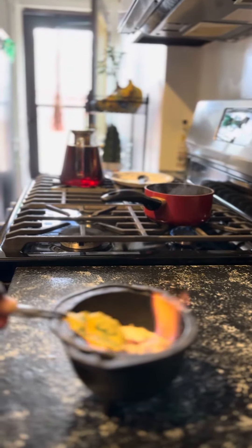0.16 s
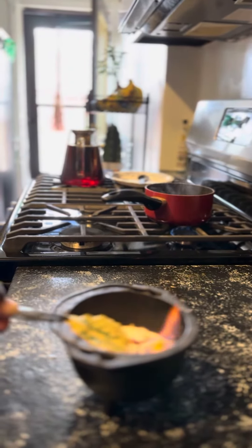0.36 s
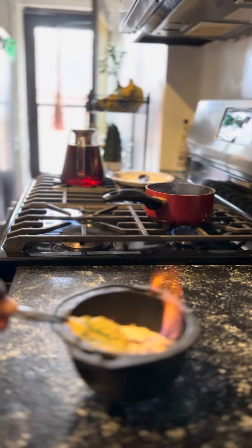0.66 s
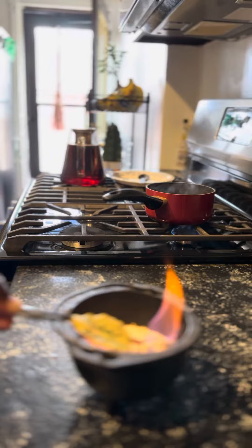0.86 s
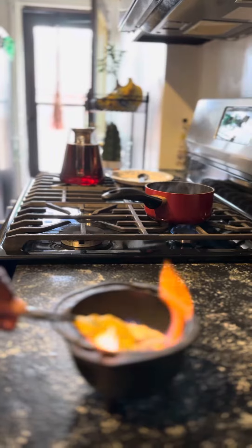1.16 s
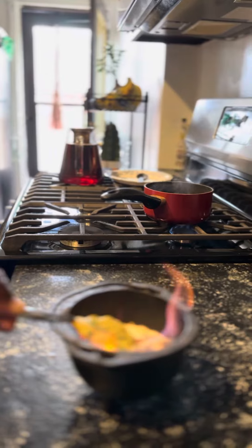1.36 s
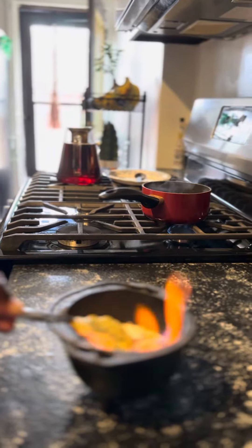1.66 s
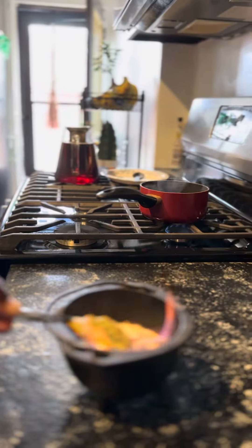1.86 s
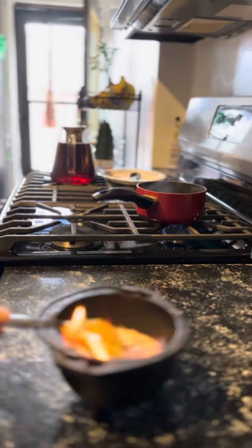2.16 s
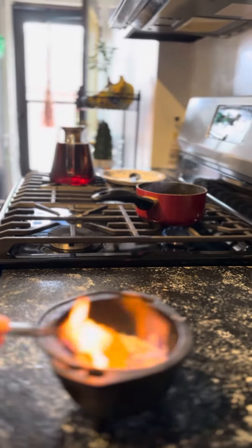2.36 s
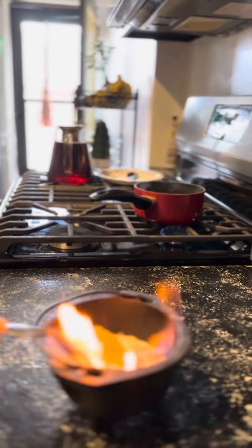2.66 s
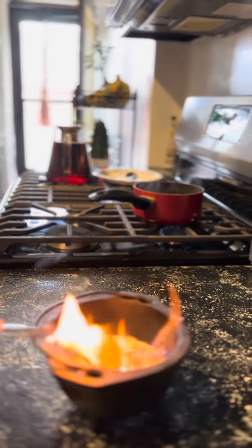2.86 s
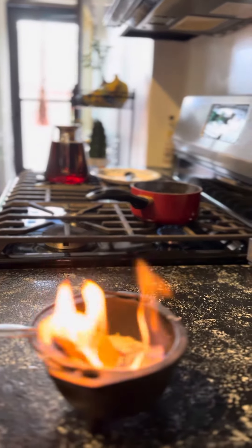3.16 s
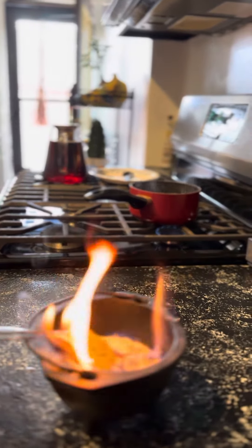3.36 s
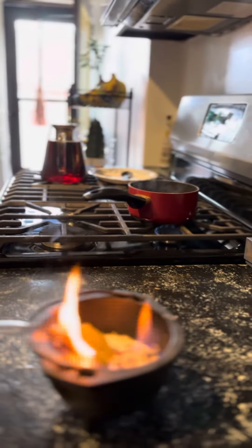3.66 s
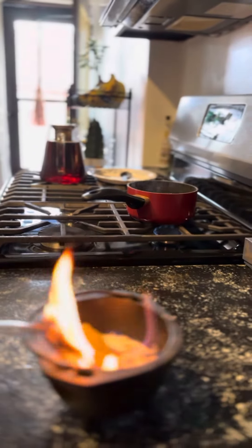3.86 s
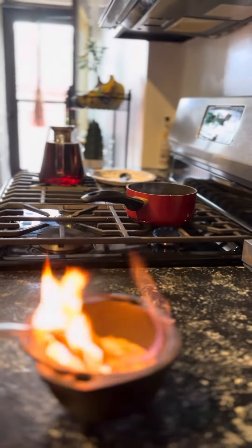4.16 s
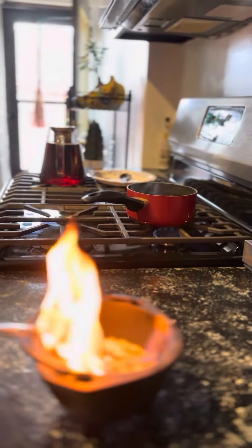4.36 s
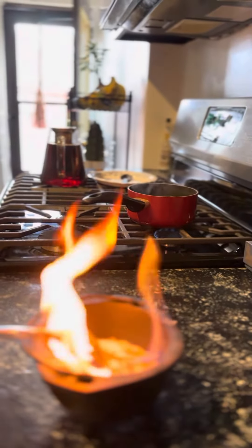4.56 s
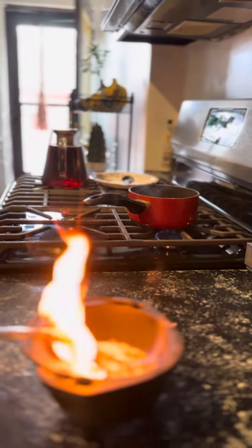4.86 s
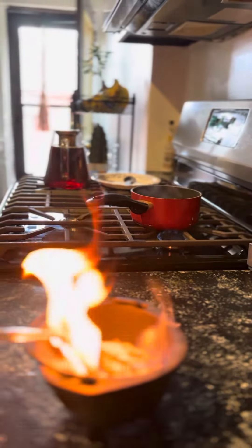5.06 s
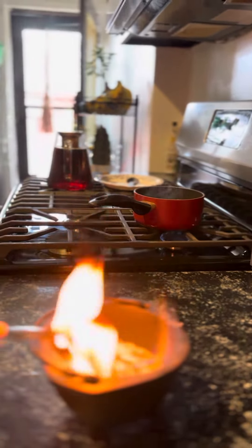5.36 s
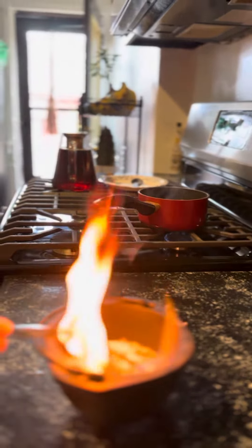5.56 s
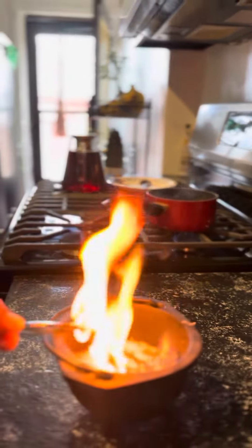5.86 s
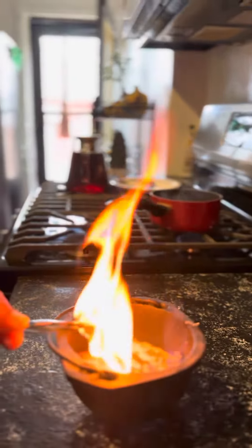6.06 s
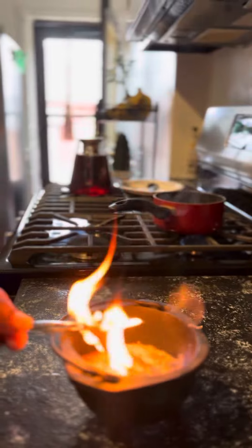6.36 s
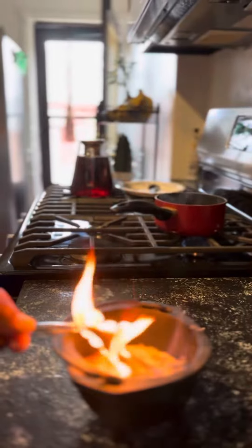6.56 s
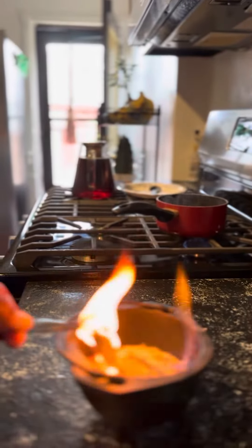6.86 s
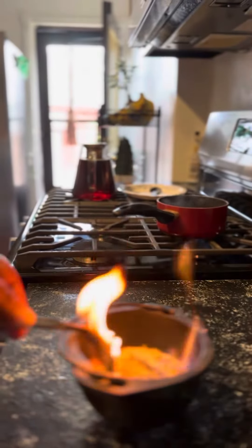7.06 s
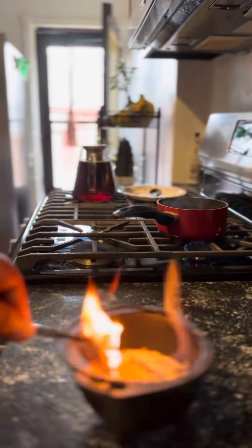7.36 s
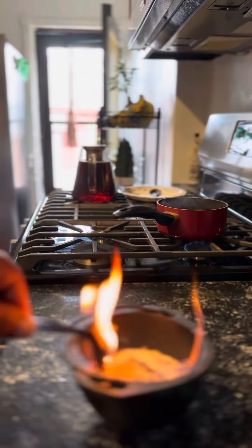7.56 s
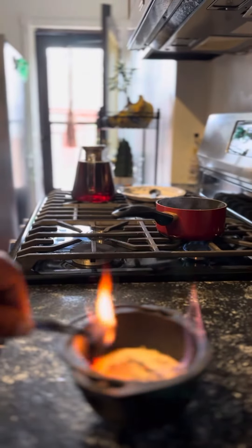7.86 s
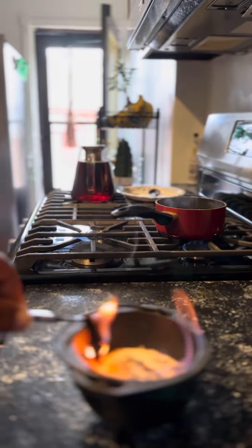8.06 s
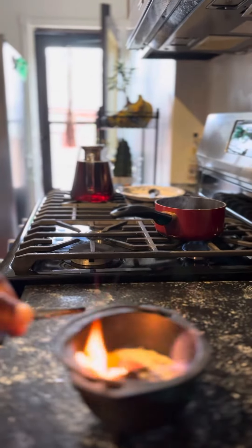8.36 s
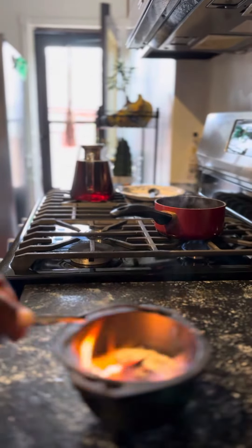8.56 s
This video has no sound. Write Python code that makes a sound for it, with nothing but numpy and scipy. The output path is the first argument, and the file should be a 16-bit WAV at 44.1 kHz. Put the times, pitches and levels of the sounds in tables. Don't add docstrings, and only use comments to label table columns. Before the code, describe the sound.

For the first half second there is only a quiet kitchen: faint low refrigerator hum, soft rumble and thin airy hiss. Around 0.5 s scraps catch, and a fine crisp sizzle starts with small ticks; low, soft puffs of flame follow from 0.85 s. At 1.7 s comes the loudest, sharpest snap. Between 2 and 2.8 s stirring brings dense crackling and stronger fluttering puffs. A brief crisp surge comes at 3.6 s, then the flame flutters fullest around 4 to 4.5 s with frequent snaps. From 5.2 s, faint low air bumps touch the microphone; crackles become sparser and less hollow while puffs cluster around 5.6 to 6.8 s. It calms near 7.2 s, flares at 8 to 8.2 s with rapid snaps and puffs, then fades into tiny ember ticks, with a soft bump at 8.6 s. Close stereo, small lightly reflective kitchen.

```python
import sys
import numpy as np
from scipy import signal
from scipy.fft import rfft, irfft, next_fast_len
from scipy.io import wavfile
from scipy.ndimage import uniform_filter1d, map_coordinates

SR = 44100
rng = np.random.default_rng(int(sys.argv[2]) if len(sys.argv) > 2 else 0)


def store_pcm(level_fs):
    pcm = np.round(np.clip(level_fs, -1, 1) * 32767).astype(np.int16)
    wavfile.write(sys.argv[1], SR, np.atleast_2d(pcm).T)


def boost_factor(decibels):
    exponent = np.asarray(decibels, float) / 20
    return 10 ** exponent


N = 384552


def unit(x):
    return x / np.sqrt(np.mean(x ** 2) + 1e-30)


def along(points, hz):
    f, v = np.transpose(points)
    return np.interp(np.log(hz + 1), np.log(f + 1), v)


def curve(rows):
    s, v = np.transpose(rows)
    return np.interp(np.arange(N) / SR, s, v)


def wobble(rate):
    knots = rng.standard_normal(int(N * rate / SR) + 4)
    return map_coordinates(knots, [np.arange(N) * rate / SR])


def filtered(x, response):
    m = 2 * next_fast_len(N // 2 + SR // 8)
    return irfft(rfft(x, m) * response(np.fft.rfftfreq(m, 1 / SR)), m)[..., :N]


def causal(spectrum):
    def response(hz):
        cep = irfft(np.log(boost_factor(np.maximum(along(spectrum, hz), -70))))
        half = len(cep) // 2
        cep[1:half] *= 2
        cep[half + 1:] = 0
        return np.exp(rfft(cep))
    return response


def scatter(times, shapes):
    start = np.round(np.asarray(times) * SR).astype(int)[:, None]
    at = start + np.arange(shapes.shape[1])
    return np.bincount(at.ravel(), shapes.ravel(), N + SR)[:N]


def bursts(count, life, after_db, vary):
    t = np.arange(round(SR / 80)) / SR
    draw = rng.standard_normal((count, len(t) + 1))
    u = t / (life * np.exp(vary * draw[:, :1]))
    split = 2 * np.sqrt(u) * np.exp(-u)
    rattle = boost_factor(after_db) * np.minimum(u, 1) * np.exp(-t / 0.0044)
    burst = draw[:, 1:] * (split + rattle)
    return burst / np.linalg.norm(burst, axis=1, keepdims=True)


def swarm(count, spread_db, top_db, life):
    draw = rng.random((count, 2))
    size = boost_factor(np.minimum(-spread_db * np.log(1 - draw[:, 1:]), top_db))
    return unit(scatter(draw[:, 0] * N / SR, size * bursts(count, life, after_db=-18.5, vary=0.53)))


def diffuse(spectrum, side_db, patchy_db):
    z = signal.stft(rng.standard_normal((2, N)), nperseg=512)[2]
    field = uniform_filter1d(rng.standard_normal(z.shape[1:]), size=6, axis=0)
    field = uniform_filter1d(field, size=10, axis=1)
    pair = signal.istft(z * boost_factor(patchy_db * unit(field)), nperseg=512)[1][:, :N]

    def colour(hz):
        return boost_factor(along(spectrum, hz)) * np.array([np.ones_like(hz), boost_factor(along(side_db, hz))])
    mid, side = filtered(pair, colour)
    return np.array([mid + side, mid - side]) / np.std(mid)


MOTOR_HZ = 58.88
# [multiple of the shaft rate, peak level/dB]
MOTOR = [(1, -64), (2, -66), (10, -74), (14, -75), (25, -90), (26, -90), (27, -87), (29, -89), (31, -90),
         (32, -83), (33, -90), (35, -90), (40, -93), (41, -91), (51, -94)]


def fridge():
    turn = 2 * np.pi * MOTOR_HZ * np.arange(N) / SR
    hum = 0
    for k, db in MOTOR:
        hum = hum + boost_factor(db + 2.6 * wobble(7.9)) * np.sin(k * turn + 7 * rng.random())
    return hum


# [f/Hz, side minus mid level/dB]
KITCHEN_SIDE = [(60, -20), (110, -25), (200, -10.5), (380, -12.5), (800, 5), (1900, -2.5), (3200, 1.5),
                (4900, 6), (6800, -10.5), (9000, 7), (12800, 11), (15200, 4)]
# [f/Hz, level/dB]
KITCHEN_HISS = [(700, -49), (1000, -8), (1900, -2), (2600, -3), (3230, -12.5), (4350, -7), (5000, -12),
                (7500, -14), (10500, -31), (12800, -35), (15200, -20), (16500, -34)]


def hiss():
    return boost_factor(-75.5) * diffuse(KITCHEN_HISS, KITCHEN_SIDE, patchy_db=1.8)


# [f/Hz, level/dB per Hz]
RUMBLE = [(20, -23), (45, -7.5), (58, -0.5), (70, 5), (82, -6.5), (120, -1), (150, 1.5), (170, -2),
          (185, -9), (269, -10.5), (341, -5), (560, -16), (1000, -33), (1430, -57)]
RUMBLE_DB, RUMBLE_GROWS, RUMBLE_SMOOTH_S = -51, 0.3, 0.071


def rumble():
    slow_db = uniform_filter1d(flutter_db(), size=round(RUMBLE_SMOOTH_S * SR))
    level_db = RUMBLE_DB + RUMBLE_GROWS * (slow_db - slow_db.mean())
    return boost_factor(level_db + 1.06 * wobble(5.4)) * diffuse(RUMBLE, KITCHEN_SIDE, patchy_db=1.7)


# [f/Hz, time to fall 60 dB t/s]
WALLS = [(200, 0.25), (2500, 0.22), (10000, 0.14)]


def walls(x):
    hz, t, z = signal.stft(rng.standard_normal((2, SR // 3)), SR, nperseg=256)
    z[1] *= boost_factor(along(KITCHEN_SIDE, hz))[:, None]
    decay = boost_factor(-60 * t / along(WALLS, hz)[:, None])
    mid, side = signal.istft(z * decay, SR, nperseg=256)[1]
    tail = np.array([mid + side, mid - side]) / np.linalg.norm(mid)
    late = np.pad(x, (90, 0))
    return signal.fftconvolve(late[None], tail, axes=1)[:, :N]


# [t/s, peak level/dB, pitch f/Hz]
BUMPS = [
    (5.18, -52, 130),
    (5.33, -61, 90),
    (5.539, -46, 171),
    (8.602, -48, 155),
]


def bumps():
    s, db, hz = np.transpose(BUMPS)[:, :, None]
    t = np.arange(SR // 12) / SR
    swell = (t / 0.013) * np.exp(1 - t / 0.0095)
    bump = boost_factor(db) * np.sin(2 * np.pi * hz * t) * swell
    return scatter(s[:, 0] - .02, bump) * np.array([[1.], [-.7]])


# [t/s, length t/s, sizzle level/dB, flutter level/dB]
STIRS = [(0.625, 0.04, -55.5, -60), (0.725, 0.034, -57, -53), (1.056, 0.15, -66.5, -54),
         (1.303, 0.15, -60.5, -58.5), (1.603, 0.077, -57.5, -72), (1.778, 0.075, -62, -75),
         (2.006, 0.079, -54, -54.5), (2.202, 0.13, -52.5, -48.5), (2.315, 0.033, -53, -44.5),
         (2.495, 0.24, -57.5, -57), (2.773, 0.039, -54, -48), (2.95, 0.074, -63, -78),
         (3.169, 0.062, -57, -52.5), (3.615, 0.095, -47.5, -52.5), (3.78, 0.036, -52.5, -65),
         (3.96, 0.1, -57.5, -49.5), (4.162, 0.11, -54.5, -49), (4.236, 0.093, -54, -44.5),
         (4.415, 0.19, -58, -50.5), (4.65, 0.15, -59.5, -74), (4.873, 0.11, -52, -50.5),
         (5.19, 0.12, -59, -50), (5.575, 0.027, -58, -47.5), (5.938, 0.1, -66, -52),
         (6.426, 0.052, -58, -48), (6.84, 0.12, -59, -51.5), (7.34, 0.038, -65, -50.5),
         (7.59, 0.049, -79, -53), (7.97, 0.13, -59, -50.5), (8.12, 0.092, -50.5, -49)]


def stirred(base_db, peaks_db):
    power = boost_factor(2 * base_db[::64])
    t = np.arange(len(power)) * 64 / SR
    for (s, length, *_), db in zip(STIRS, peaks_db):
        power = power + boost_factor(2 * db) * np.exp(-2 * ((t - s) / length) ** 2)
    return np.interp(np.arange(N) / SR, t, 10 * np.log10(power))


# [t/s, flutter level/dB]
BLAZE = [(0, -63), (.4, -62), (.7, -57), (1.8, -58), (2.3, -57), (3, -57.5), (4.2, -51), (5.4, -56.5),
         (6.3, -53), (7.2, -60), (8.1, -53), (8.72, -55.5)]


def flutter_db():
    return stirred(curve(BLAZE), [row[3] for row in STIRS])


# [t/s, peak level/dB, pitch f/Hz]
PUFFS = [(.851, -36.5, 370), (1.1, -30.5, 380), (2.131, -30, 350), (2.282, -26, 400), (2.727, -31, 400),
         (3.125, -37.5, 363), (3.948, -34, 330), (4.107, -31, 390), (4.127, -27, 410), (4.402, -28.5, 353),
         (4.447, -34, 345), (5.202, -32.5, 395), (5.627, -31, 387), (5.751, -32.5, 332), (5.81, -33.5, 372),
         (6.001, -32, 367), (6.078, -31, 375), (6.259, -31, 365), (6.396, -31.5, 370), (6.421, -28, 356),
         (6.643, -30, 460), (6.756, -29, 390), (6.79, -33, 330), (7.501, -35, 346), (7.662, -33, 316),
         (8.001, -30, 356), (8.055, -27.5, 390), (8.101, -26, 382), (8.126, -28, 390), (8.346, -31.5, 390)]
# [f/Hz, level/dB per Hz]
FLAME = [(110, -43.5), (180, -2), (274, -10.5), (375, 1), (438, -13), (508, -12), (717, -8), (805, -14),
         (922, -12.5), (1190, -18.5), (1300, -13), (1430, -22), (2200, -29), (2860, -51), (4840, -120)]


def flame():
    s, db, hz = np.transpose(PUFFS)[:, :, None]
    t = np.arange(SR // 40) / SR
    cycles = hz * (0.976 * t + 3 * 0.001197 * (1 - np.exp(-t / 0.00069)))
    push = np.sin(2 * np.pi * cycles) * np.exp(-t * hz / 1.36) * (1 - np.exp(-t / 0.0013))
    puffs = scatter(s[:, 0] + 0.001493, boost_factor(db - 2.5) * push)
    lumps = swarm(count=1000, spread_db=3.5, top_db=11.0, life=0.00058) + 0.59 * rng.standard_normal(N)
    unsteady = boost_factor(0.89 * wobble(25) + 0.47 * wobble(17))
    flutter = unit(filtered(lumps * unsteady, causal(FLAME)))
    return puffs + boost_factor(flutter_db() - 3.0) * flutter


HOLLOW_HZ, HOLLOW_WIDTH_HZ = 2730, 760


def hollow_ring(f):
    return 1j * f * HOLLOW_WIDTH_HZ / (HOLLOW_HZ ** 2 - f * f + 1j * f * HOLLOW_WIDTH_HZ)


EMBERS_DB, EMBERS_GROW = -62, 0.7
CATCH_S, CATCH_RISE_S = 0.48, 0.076
SPENT_S, SPENT_DB = 8.3, -6


def sizzle_db():
    t, blaze_db = np.arange(N) / SR, curve(BLAZE)
    lit_db = -20 * np.clip((CATCH_S - t) / CATCH_RISE_S, 0, 1) + SPENT_DB * (t > SPENT_S)
    embers_db = EMBERS_DB + EMBERS_GROW * (blaze_db - blaze_db.mean())
    return stirred(embers_db + lit_db, [row[2] for row in STIRS])


# [f/Hz, level/dB per Hz]
CRISP = [(530, -37.5), (900, -2.5), (1180, -8.5), (1300, -5), (1490, -11), (2260, -14.5), (2690, 14.5),
         (3230, -18), (4790, -23), (5760, -9.5), (7360, -15), (8850, -8.5), (12500, -21), (15400, -16.5),
         (17000, -34.5)]
GRAIN_TOP_DB = 11
BURNT_FROM_S, BURNT_BY_S, BURNT_DAMPS = 5.2, 7.6, 0.39


def sizzle():
    def direct(f):
        return causal(CRISP)(f) * (1 - 0.78 * hollow_ring(f))
    grains = swarm(count=4000, spread_db=4.5, top_db=GRAIN_TOP_DB, life=0.00035)
    grains = grains + 0.5 * rng.standard_normal(N)
    deep = swarm(count=1800, spread_db=8.5, top_db=GRAIN_TOP_DB, life=0.00051)
    clumps = boost_factor(2.8 * wobble(35) + 1.67 * wobble(9.1))
    fizz = unit(filtered(grains * clumps, direct) + 0.65 * filtered(deep * clumps, hollow_ring))
    burnt = np.clip((np.arange(N) / SR - BURNT_FROM_S) / (BURNT_BY_S - BURNT_FROM_S), 0, 1)
    fizz = fizz - BURNT_DAMPS * burnt * filtered(fizz, hollow_ring)
    return boost_factor(sizzle_db() - 0.77) * fizz


def levelled(crack, response, band):
    hz = np.fft.rfftfreq(1024, 1 / SR)
    z = rfft(crack, 1024, axis=1) * response(hz)
    inside = (hz > band[0]) & (hz < band[1])
    energy = np.sum(np.abs(z[:, inside]) ** 2, axis=1, keepdims=True) / 512
    return irfft(z * np.sqrt(.002 * SR / energy), axis=1)


SNAP_COLOUR = 0.81


def snap_response(f):
    flat = [(at, SNAP_COLOUR * min(level, -6)) for at, level in CRISP]
    no_bass = (1j * f / (3400 + 1j * f)) ** 2
    soft_top = 1 / (1 + 1j * f / 13000) ** 2
    return causal(flat)(f) * (1 - 0.18 * hollow_ring(f)) * soft_top * no_bass


# [t/s, treble level/dB, hollow over treble level/dB, length/ms]
SNAPS = [(1.458, -42, 4.5, 0.58), (1.5838, -46.5, 2, 0.55), (1.6035, -44, -10, 0.47),
         (1.6157, -35.5, -7, 0.33), (1.6828, -24.5, -6, 0.47), (1.9412, -46, -5, 0.35),
         (2.0401, -41, -29, 0.25), (2.1284, -60, 16, 0.63), (2.1556, -55.5, 11.0, 0.45),
         (2.182, -39.5, 1.0, 0.42), (2.2255, -41, -6, 0.4), (2.2706, -33, -12.0, 0.39),
         (2.353, -32.5, 1, 0.47), (2.431, -42.5, -3, 0.39), (2.5968, -42.5, -22, 0.42),
         (2.714, -50.0, 4, 0.3), (3.1179, -46.5, 6, 0.49), (3.5795, -45.5, 2, 0.49), (3.5905, -40, 2, 1),
         (3.6034, -35.5, -16, 1.05), (3.6295, -47, 4, 0.63), (3.6881, -37, -22, 0.5),
         (3.968, -41, -10, 0.48), (3.991, -41.5, -0.5, 1), (4.173, -45, -9, 0.68),
         (4.239, -38.5, -13, 0.47), (4.3691, -37.5, -15, 0.41), (4.6628, -45.5, -4.5, 0.39),
         (4.843, -38.5, -10, 0.6), (4.956, -41.5, -3.5, 0.75), (5.5345, -44, -7.5, 0.47),
         (5.5395, -40, -10, 0.41), (5.9755, -44.5, -40, 0.41), (5.9838, -40, -28, 0.35),
         (6.3644, -37, -15, 0.33), (6.9961, -48.5, -0.5, 0.83), (7.457, -43.5, -16, 0.38),
         (7.661, -49.0, 4.5, 0.25), (7.692, -43.5, -0.5, 0.5), (7.9052, -40.5, -10, 0.85),
         (7.9352, -45.5, -9.0, 0.4), (7.9505, -41.5, -10, 0.68), (8.0197, -32.5, -30, 0.45),
         (8.0608, -35, -41, 0.81), (8.0804, -43, -8, 0.86), (8.1195, -39, -29, 0.49),
         (8.1286, -38, -1.5, 0.34), (8.147, -44.0, -12, 0.6), (8.188, -42, -2, 0.99),
         (8.2532, -42, -4, 0.36)]
# [t/s, treble level/dB, hollow over
# treble level/dB]
TICKS = [(0.5812, -56, 7), (0.7044, -62, 8), (1.188, -53.5, 1), (1.243, -48, -10.0), (1.3133, -47, -3),
         (1.3624, -54, 3.0), (1.5193, -68, 10), (1.5355, -39.5, -6), (1.559, -49, 7), (1.9557, -52.0, 1.0),
         (1.972, -49.5, -2.0), (2.0194, -47, -3.0), (2.0756, -53, 0.0), (2.1541, -68, -2),
         (2.196, -43, -8.0), (2.2489, -53.5, 6.0), (2.2616, -47.5, 4), (2.4427, -48, -4), (2.489, -50, -8),
         (2.526, -60, 12.0), (2.568, -53, -2), (2.5875, -49.5, 4), (2.623, -46.5, -3.0),
         (2.6487, -52.0, -3.5), (2.9122, -45.5, -21), (3.087, -50, -6), (3.3686, -45.5, -2),
         (3.525, -50, 2.0), (3.652, -49, -5.0), (3.6661, -46.5, -2), (4.043, -41, -18.0),
         (4.2461, -48.0, -1.0), (4.287, -43, -8), (4.3987, -45, 3.5), (4.4067, -45, 0), (4.5112, -47, -17),
         (4.787, -44.5, -10), (4.7966, -53, -3.0), (4.828, -45, -5), (5.2044, -54, 6), (5.3516, -55.5, 5),
         (5.4697, -53, 2.5), (5.7552, -52.5, -17), (5.844, -52.5, -5), (5.919, -46.5, -16),
         (6.0802, -50.5, -4), (6.3258, -49.5, -7), (6.4815, -49.5, -5), (6.7573, -47.5, -1),
         (6.802, -45.5, -19), (7.2704, -46, -13), (7.338, -47, -9), (7.587, -49, 1), (7.7973, -54, -2.0),
         (7.875, -47, -16), (8.0836, -47, -7), (8.1627, -48, -4), (8.271, -46, -2), (8.3473, -61.5, 14),
         (8.5124, -58.5, 7),
         (0.5197, -53.5, -3), (0.6096, -60, -2), (0.7395, -57, 5), (1.0412, -53, 3), (1.226, -53, 0),
        (1.254, -55.5, 1.5), (1.302, -57, 7), (1.323, -48, -10), (1.338, -58, 5), (1.398, -54, -1.0),
        (1.781, -53, -1), (1.872, -56.5, 5), (1.9106, -61, 6.0), (1.9802, -60, 5.0), (2.0146, -52.5, 2),
        (2.1234, -50.5, -3.0), (2.2654, -51.0, -2.0), (2.2833, -53, 1.0), (2.323, -58, 5), (2.422, -53, -7),
        (2.5769, -58, -9), (2.7607, -59.5, 8), (2.8021, -50, -2.5), (2.923, -60.5, 6), (2.989, -50, -7),
        (3.2855, -49, -5), (3.3288, -54, 2), (3.5307, -54, -5), (3.6187, -51.5, 6), (3.6714, -48, 1.0),
        (3.7807, -46, -13.0), (3.8098, -65, 6), (3.895, -53, -2), (4.034, -46.5, -3.5), (4.1304, -50, -7),
        (4.2179, -53, -1.0), (4.312, -50.5, -4), (4.3267, -45, -10.0), (4.4427, -47.5, -9), (4.514, -54, 6),
        (4.821, -49, -7), (5.2206, -53, -1.0), (5.9258, -52.5, -4), (6.052, -55.5, -8.5), (6.1341, -54, -7),
        (6.341, -51, -9), (6.395, -53.5, -3), (6.9163, -45, -11), (6.9919, -55, 0), (7.1058, -57.5, 1),
        (7.3234, -50, -7.0), (7.3597, -57, 1), (7.5493, -52, -15), (7.6107, -57.0, 6), (7.6479, -63, -1.0),
        (7.7362, -52, -5.0), (7.9249, -52.0, 3), (7.9827, -45, -13), (8.138, -49.0, -1), (8.5352, -56.5, 2),
         (0.4728, -59, 2), (0.7226, -63, -1), (0.938, -52, -18), (1.0496, -62, 7), (1.2687, -54, -2),
         (1.284, -53.5, -3.5), (2.0007, -54.0, -1.0), (2.0082, -60, 6.0), (2.0279, -50, -1),
         (2.0705, -52, -6), (2.0806, -60.5, 9.0), (2.15, -72, 27.5), (2.1865, -53.5, 5.0),
         (2.215, -55.5, 10.5), (2.22, -47, -9), (2.342, -48, -13.0), (2.3906, -50.5, -1), (2.668, -59, 1.0),
         (2.6971, -61, 1.0), (2.7744, -54, -16.0), (2.9528, -62, -6), (3.0119, -60.0, 2),
         (3.2333, -54, -9.0), (3.294, -52, -9), (3.316, -53, -1), (3.5467, -52.5, -3), (3.5607, -55.0, 1.0),
         (3.717, -55.5, 3), (3.736, -55, 0), (3.7776, -51, 0), (3.8744, -54.5, -4), (3.9184, -58.5, 4.0),
         (3.947, -56, -6.0), (3.959, -59, -4), (4.11, -61.0, 10.0), (4.2104, -55, -1.0),
         (4.2608, -68.0, 19.0), (4.3198, -56.5, 5), (4.416, -71, 17), (4.435, -54, 1.0),
         (4.4477, -52.0, -6), (4.6459, -64, 1.0), (4.8807, -63, 4), (4.9004, -58, 6.0), (5.0826, -55, 0),
         (5.3245, -69, 4), (5.4507, -52, -1), (5.512, -57.0, 4), (6.0044, -56.5, -2), (6.1745, -62, -1),
         (6.4212, -55, -1.0), (6.4291, -54, 0.0), (6.723, -56.5, 4), (6.8315, -50, -4), (6.8925, -56, 4),
         (7.292, -51, -4), (7.503, -73.5, 17.0), (7.9943, -47, -8), (8.2035, -55.0, 2.0), (8.6688, -60, 4)]
# [t/s, treble level/dB, hollow over treble level/dB]
DYING = [
    (8.385, -61, 9),
    (8.397, -73, -6),
    (8.42, -61, 7),
    (8.451, -67, 11),
    (8.488, -62, -2),
    (8.559, -69, -6),
    (8.703, -63.5, -3),
]
RISE_OF_LENGTH, TICK_MS = .85, .6
TREBLE_BAND_HZ, DEEP_BAND_HZ = (4000, 11000), (2200, 3300)


def snaps():
    big = [(*row[:3], RISE_OF_LENGTH * row[3]) for row in SNAPS]
    small = [(*row, TICK_MS) for row in TICKS + DYING]
    s, db, hollow_db, rise_ms = np.transpose(big + small)
    rise = np.maximum(rise_ms, .05) / 1000
    s = s - rise / 2
    crack = bursts(len(s), life=rise[:, None], after_db=-15.5, vary=0.17)
    tint_db = 3.6 * rng.standard_normal((len(s), 1))

    def tinted(f):
        octaves = np.log2(np.clip(f, 3000, 12000) / 6000)
        return snap_response(f) * boost_factor(tint_db * octaves)

    def in_bowl(f):
        return hollow_ring(f) * 1j * f / HOLLOW_HZ
    bright = boost_factor(db - 4.1)[:, None] * levelled(crack, tinted, TREBLE_BAND_HZ)
    hollow = boost_factor(db + hollow_db - 8.2)[:, None] * levelled(crack, in_bowl, DEEP_BAND_HZ)
    return scatter(s, bright) + scatter(s, hollow)


# [f/Hz, side minus mid level/dB]
NEAR_SIDE = [(100, -24), (330, -21), (800, -6), (1800, -17.5), (2500, -18), (3200, 0.5), (3700, -16),
             (4900, 5), (6300, -11.5), (9000, -2.5), (11000, 7), (12800, 4), (14000, 5.5), (15500, 5.5)]
# [f/Hz, turn/rad]
SIDE_TURN = [(300, 0), (700, 1.05), (1300, -1.5), (2700, 1.16), (3400, -2), (4500, -5), (6000, -4),
             (6400, -8), (11000, -8), (12200, -4.5), (13000, -2.5), (16000, -7.5)]


def ports(x):
    def difference(hz):
        return boost_factor(along(NEAR_SIDE, hz)) * np.exp(1j * along(SIDE_TURN, hz))
    side = filtered(x, difference)
    return np.array([x + side, x - side])


def scene():
    bowl = flame() + sizzle() + snaps()
    kitchen = fridge() + hiss() + rumble() + boost_factor(-11.0) * walls(bowl)
    return kitchen + bumps() + ports(bowl)


def roll_off(x):
    return signal.sosfilt(signal.butter(12, 17120, fs=SR, output="sos"), x)


CLICK_GUARD_S, SHARP_DB = .0025, 11
FAVOURED_HZ, FAVOUR_DB = 14900, 6


def record(dry):
    pair = np.array([dry[0] + dry[1], dry[0] - dry[1]]) / 2
    hz, t, z = signal.stft(pair, SR, nperseg=1024)
    power = uniform_filter1d(np.abs(z) ** 2, size=20, axis=1)
    power = uniform_filter1d(power, size=3, axis=2)
    side_db = 10 * np.log10(power[1] / power[0])

    def drift(rate):
        return np.interp(t * SR, np.arange(N), wobble(rate))
    treble = np.sum(np.abs(z[1, hz > 8000]) ** 2, axis=0)
    spare_db = np.repeat(rng.random(len(t)), 2)[:len(t)] ** 3 * 10
    spare_db = spare_db + 0.081 * (10 * np.log10(treble / np.median(treble)))
    f = hz[:, None]
    favour_db = (f > FAVOURED_HZ) * FAVOUR_DB * (drift(11) > -.2)
    always_mid = f < 10500 + 60 * spare_db + 350 * drift(25)
    keep_mid = (side_db < .5 + spare_db + favour_db) | always_mid
    keep_side = (side_db > -6.5 - spare_db) | (f < 1300)
    keep = np.array([keep_mid, keep_side]) & (f < 16050)
    kept = signal.istft(z * keep, SR, nperseg=1024)[1][:, :N]

    edge = np.diff(pair[1], 3, prepend=[0, 0, 0]) ** 2
    sharp = uniform_filter1d(edge, size=64) > boost_factor(2 * SHARP_DB) * uniform_filter1d(edge, size=2048)
    near = uniform_filter1d(1. * sharp, size=round(2 * CLICK_GUARD_S * SR))
    near = uniform_filter1d(np.clip(99 * near, 0, 1), size=64)
    mid, side = kept + near * filtered(pair - kept, lambda hz: hz < 16700)
    return roll_off(np.array([mid + side, mid - side]))


dry = scene()
out = record(dry)
store_pcm(out)
```